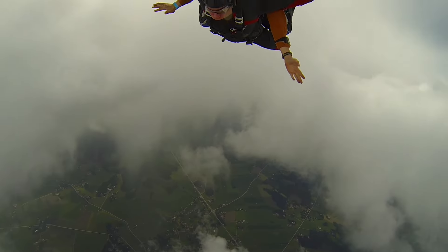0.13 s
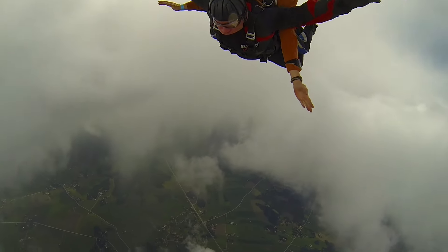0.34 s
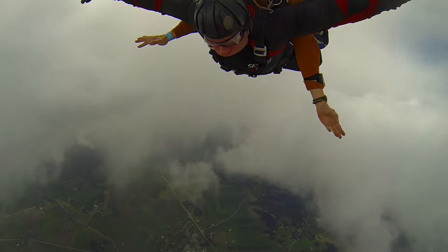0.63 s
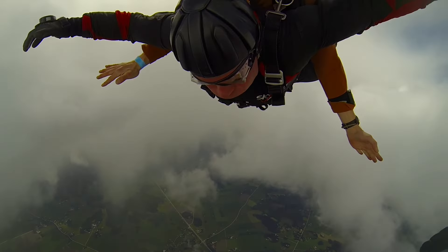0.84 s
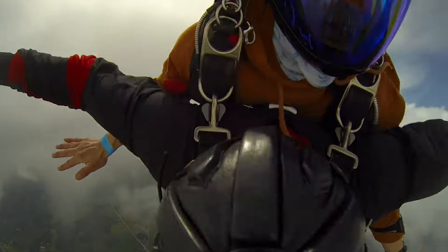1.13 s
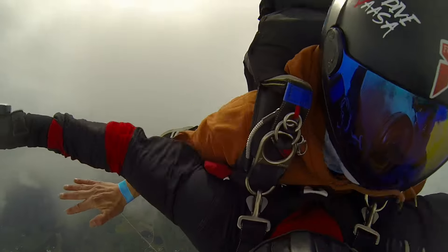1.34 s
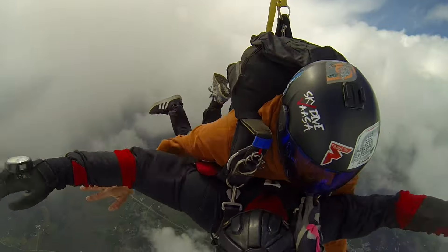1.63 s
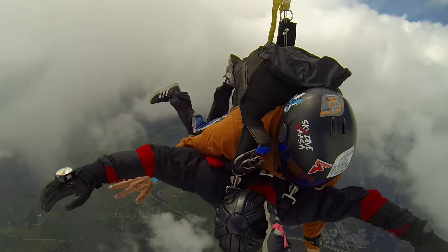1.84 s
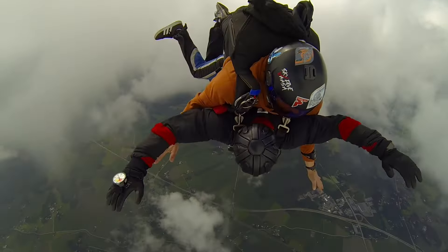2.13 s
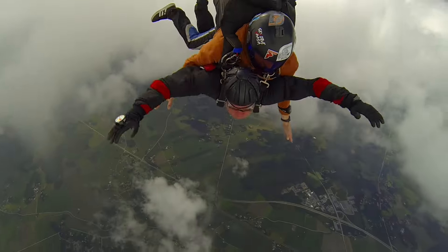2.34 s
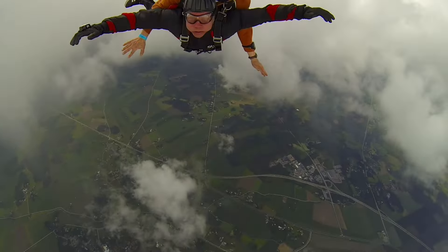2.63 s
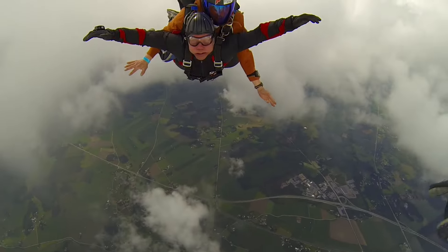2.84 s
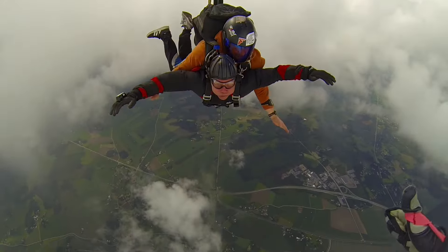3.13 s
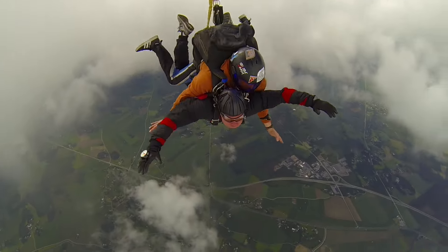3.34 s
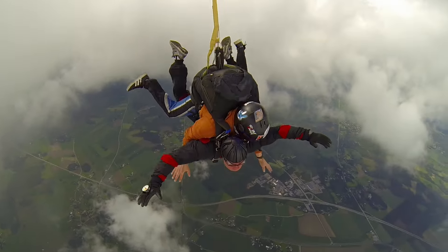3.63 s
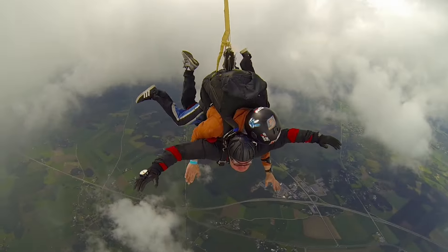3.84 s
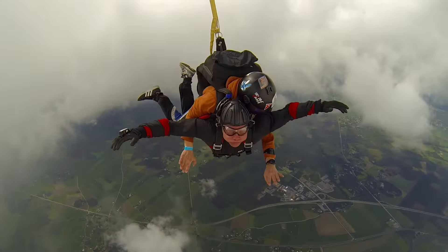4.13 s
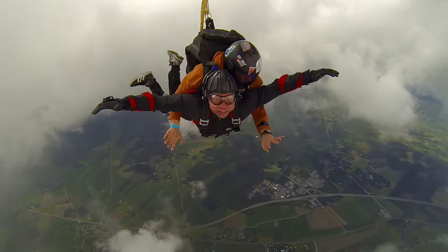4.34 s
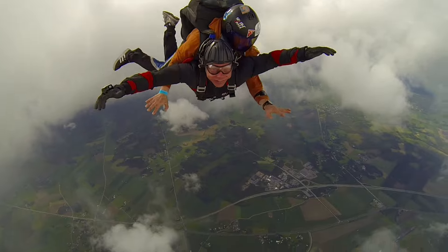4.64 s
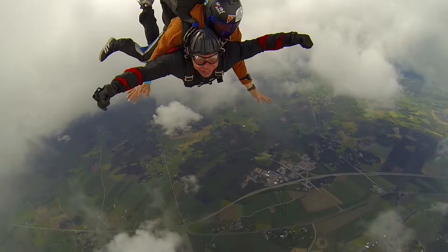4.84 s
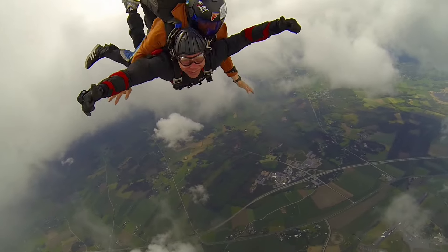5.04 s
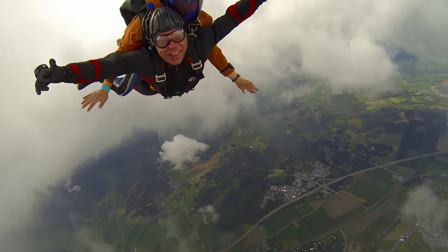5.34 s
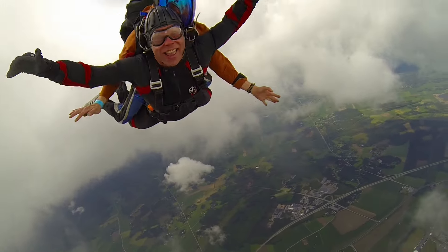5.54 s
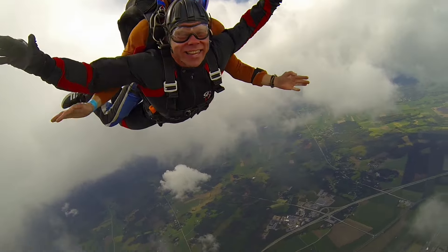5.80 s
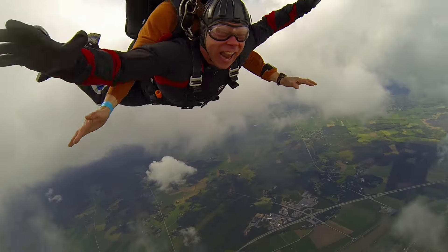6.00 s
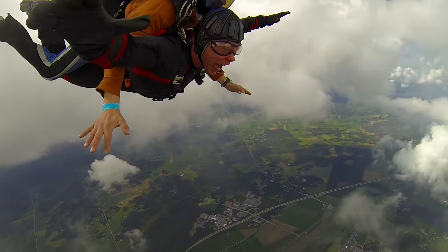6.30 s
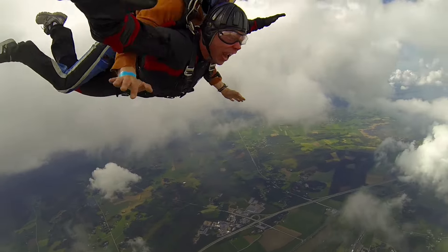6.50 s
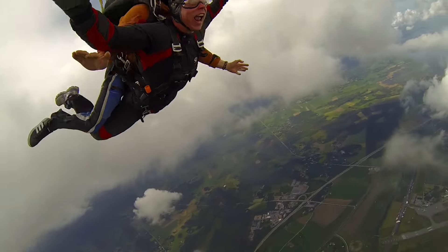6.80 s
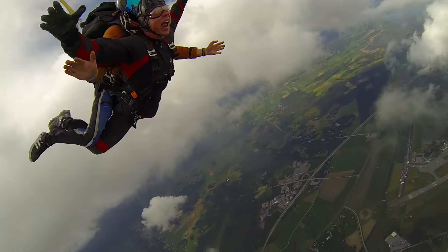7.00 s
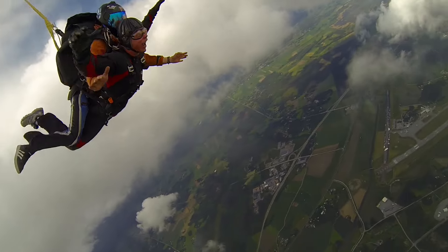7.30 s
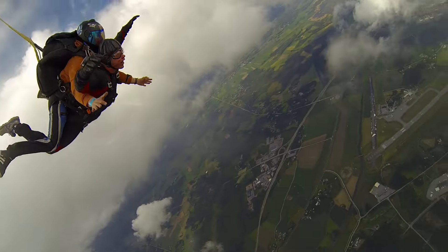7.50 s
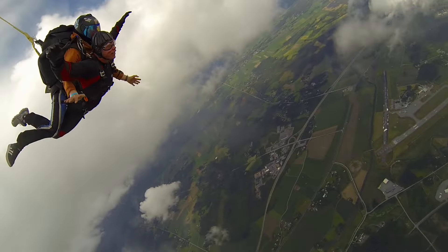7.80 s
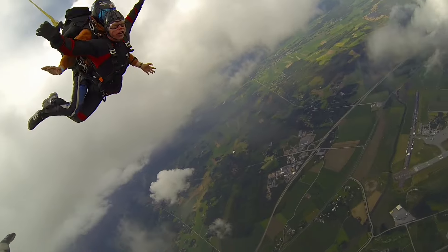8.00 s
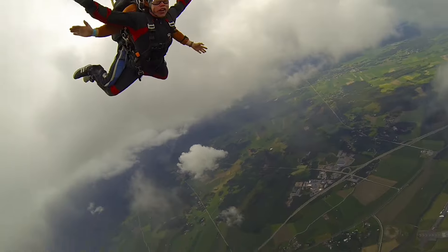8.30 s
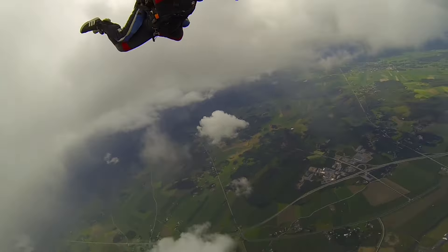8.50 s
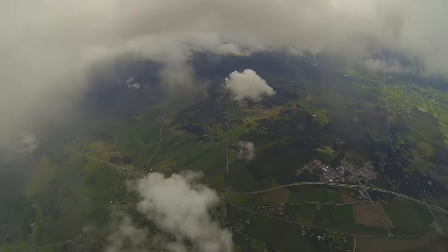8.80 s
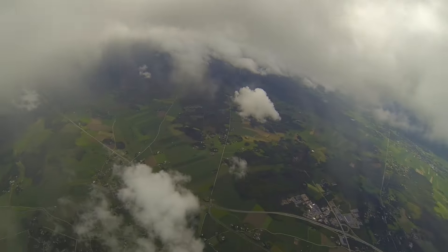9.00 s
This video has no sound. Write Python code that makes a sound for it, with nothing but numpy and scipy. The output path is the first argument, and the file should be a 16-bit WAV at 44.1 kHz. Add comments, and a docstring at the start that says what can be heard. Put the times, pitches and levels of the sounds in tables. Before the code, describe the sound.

Loud wind roars and hisses past a skydiver's helmet microphone in free fall, with low buffeting and a few sharp surges.

```python
"""Free fall in open air, heard from a microphone inside a small closed camera housing on a helmet.
From the start the air pocket round the microphone roars near 1.3 kHz; large eddies buffet the humming
shell and fine turbulence hisses above. The roar peaks sharply near 1, 3.3 and 4.9 s, and gain control
rides the peaks. From 7 to 8 s the head turns into the stream and the hiss rises; as it turns back,
the buffeting swells and the hiss settles."""
import sys
import numpy as np
from scipy import signal
from scipy.io import wavfile
from scipy.ndimage import uniform_filter1d

SR = 44100
rng = np.random.default_rng(int(sys.argv[2]) if len(sys.argv) > 2 else 0)


def master(y):
    """Save y as 16-bit WAV."""
    cut = np.clip(np.atleast_2d(y).T, -1, 1)
    pcm = np.round(cut * 32767)  # scale
    wavfile.write(sys.argv[1], SR, pcm.astype(np.int16))


N = 403515


def gain_of(db):
    return 10 ** (np.asarray(db) / 20)


def unit_rms(x):
    return x / np.sqrt(np.mean(x ** 2) + 1e-20)


def spectrum_db(points, hz):
    """A spectrum in dB on a log frequency axis, silent outside its ends."""
    f, db = np.transpose(points)
    return np.interp(np.log(hz + 1), np.log(f + 1), db, left=-120, right=-120)


def follow(rows, column, times=None):
    """One column of a curve at the given times, or at every sample."""
    rows = np.array(rows)
    return np.interp(np.arange(N) / SR if times is None else times, rows[:, 0], rows[:, column])


def bumps(rows, column, half_s):
    """A bell-shaped rise or dip in dB round each event."""
    rows, t = np.array(rows), np.arange(N) / SR
    events = zip(rows[:, 0], rows[:, column], half_s * np.ones(len(rows)))
    return sum(db * np.exp(-((t - at) / width) ** 2) for at, db, width in events)


def gusts(times):
    """Random swells of rms 1: sines of random phase from 2 to 12 Hz."""
    rates_hz = np.geomspace(2, 12, num=24)
    return unit_rms(sum(np.sin(2 * np.pi * (hz * times + rng.random())) for hz in rates_hz))


# How far the head is turned across the stream: (time [s], turn [0-1])
HEAD_TURN = [(0, 0.02), (2.4, 0.14), (2.8, 0.4), (3.3, 0.24), (6.7, 0.28), (7.2, 0.96), (8.05, 1),
             (8.5, 0.1), (9.15, 0)]
# Resonances at the microphone: (centre [Hz], width [Hz], lift head straight [dB], lift head turned [dB])
RESONANCES = [(78.8, 23, 10, 10.5), (456.5, 36, 8, 1), (750, 86, 1, 6), (1320, 99, 1.5, -2),
              (1750, 180, 0.5, 3.5), (3067, 250, 2.5, 7.5), (4820, 240, 2, 4), (6200, 590, -0.5, 2.5),
              (8280, 510, 3.5, 6), (9980, 1100, 3, 3), (13300, 1100, 1, 3)]
def resonances_db(hz, times):
    """Resonances stand out of the noise, each sliding between two strengths as the head turns."""
    turn = follow(HEAD_TURN, 1, times)
    return sum((straight_db + (turned_db - straight_db) * turn) / (1 + (2 * (hz - centre) / width) ** 2)
               for centre, width, straight_db, turned_db in RESONANCES)


def turbulence(spectrum, size, patchy_db, flicker_db, stretch=lambda times: 1):
    """Resonant air noise of rms 1, with drifting patches and a flicker shared by all frequencies."""
    hop = size // 4
    hz = np.fft.rfftfreq(size, 1 / SR)[:, None]
    times = np.arange(N // hop + 5) * hop / SR
    real, imag, patches = rng.standard_normal((len(times), len(hz), 3)).T
    patches = uniform_filter1d(patches, size=9, axis=0)  # smooth across frequency
    patches = unit_rms(uniform_filter1d(patches, size=10, axis=1))  # and across time
    flicker = unit_rms(uniform_filter1d(rng.standard_normal(len(times)), size=6))
    colour = gain_of(spectrum_db(spectrum, hz / stretch(times)) + resonances_db(hz, times))
    colour /= np.linalg.norm(colour, axis=0)  # the colour changes, the power stays
    frames = (real + 1j * imag) * colour * gain_of(patchy_db * patches + flicker_db * flicker)
    return unit_rms(signal.istft(frames, nperseg=size, noverlap=size - hop)[1][:N])


# Air over the housing: (time [s], roar level [dB], hiss level [dB])
AIRSTREAM = [(0, -19.5, -38.5), (.35, -22, -36.5), (.7, -20.5, -36), (1.2, -25.5, -40), (1.5, -21, -39),
             (2.1, -20.5, -37), (2.45, -20, -36), (2.83, -20.5, -35), (3.3, -21.5, -36), (3.75, -21, -39),
             (4.1, -20.5, -36), (5.5, -21.5, -36.5), (6.15, -20.5, -36), (6.6, -22, -38.5), (7, -22, -32.5),
             (7.45, -21, -28.5), (8.05, -22, -30), (8.35, -23.5, -35), (8.7, -20.5, -36),
             (9.15, -22.5, -40)]
# Brief dips in the loudness of roar and hiss: (time [s], half length [s], roar [dB], hiss [dB])
DIPS = [(0.365, .03, -4.5, -3), (0.803, 0.05, 0.5, -5.5), (1.033, 0.022, -1, -2), (1.28, 0.028, -3.5, -7.5),
        (1.366, 0.026, -5, -6), (1.656, 0.015, -2.5, 2), (1.73, 0.022, -2, -3), (2.092, 0.018, -3.5, 0.5),
        (2.46, 0.037, -3, -4), (2.952, 0.023, -2.5, -7), (4.21, 0.026, -2, -1), (5.668, 0.03, -4, -1.5),
        (5.79, 0.018, -3.5, -3), (6.9, 0.043, -5, -3), (8.358, 0.017, -3.5, -2), (8.566, 0.039, 1.5, -5),
        (9.055, .025, -3.5, -2)]
def stream_db(column):
    """Level of the roar (column 1) or the hiss (column 2), with its brief dips."""
    return follow(AIRSTREAM, column) + bumps(DIPS, column + 1, half_s=np.array(DIPS)[:, 1])


# Large and middle-sized eddies shaking the camera: (time [s], buffeting level [dB], wash level [dB])
SHAKING = [(0, -34, -37.5), (.5, -26, -30.5), (.9, -32, -38), (1.3, -27, -29), (1.7, -30, -32),
           (2.3, -31.5, -38), (2.7, -28, -35), (3.15, -31.5, -37), (3.5, -29.5, -40.5), (3.8, -34.5, -38),
           (4.3, -32, -37), (5.1, -30.5, -36.5), (5.6, -26, -33.5), (5.9, -27, -32.5), (6.4, -33.5, -37),
           (6.9, -28.5, -32.5), (7.8, -27.5, -35), (8.3, -23, -31), (8.7, -30.5, -36.5), (9.15, -33.5, -39)]
# Single heavy eddies thumping the shell: (time [s], lift [dB])
THUMPS = [(.49, 0.5), (1.22, 6), (1.35, 9.5), (1.81, 3), (2.37, 11), (2.78, 3.5), (3.46, 7.5), (3.57, 5),
          (5.38, 3), (5.61, 2), (6.78, 10), (7.56, 5), (7.77, 3), (8.46, 3.5)]
def shaking_db(column):
    """Level of the buffeting (column 1) or the wash (column 2), which takes about half of each thump."""
    thump_share = 1 if column == 1 else 0.49
    return follow(SHAKING, column) + thump_share * bumps(THUMPS, column=1, half_s=0.024)


# The housing walls, close round the microphone: (frequency [Hz], relative density [dB])
SHELL_SPECTRUM = [(180, -26), (300, -8.5), (480, -4), (560, -7.5), (980, -6.5), (1100, -3), (1430, -15),
                  (2400, -62)]
def shell_hum(gust):
    """The walls hum in a few broad modes, shaken by wash and hiss."""
    wash_rise_db = shaking_db(column=2) + 35
    hiss_rise_db = stream_db(column=2) + 37
    level_db = -35 + 0.37 * wash_rise_db + 0.29 * hiss_rise_db + 0.64 * gust
    return gain_of(level_db) * turbulence(SHELL_SPECTRUM, size=2048, patchy_db=1.24, flicker_db=0.72)


# Fine turbulence just outside the housing: (frequency [Hz], relative density [dB])
HISS_SPECTRUM = [(1200, -36), (2000, -5), (2700, -5.5), (3300, -7), (3850, -14.5), (5000, -13.5),
                 (5600, -18.5), (7000, -23), (8900, -33), (10500, -30), (11800, -34.5), (14000, -35.5),
                 (15400, -45)]
def hiss(gust):
    """Small eddies, coloured by the higher modes of the housing."""
    level_db = stream_db(column=2) + 0.67 * gust
    return gain_of(level_db) * turbulence(HISS_SPECTRUM, size=512, patchy_db=0.64, flicker_db=0.47)


# Middle-sized eddies, heard through the shell: (frequency [Hz], relative density [dB])
WASH_SPECTRUM = [(70, -28), (105, -6), (130, -1), (200, -4), (300, -9.5), (400, -9.5), (600, -36.5)]
def wash(gust):
    """Middle-sized eddies make a dull rush just above the buffeting."""
    level_db = shaking_db(column=2) + 0.68 * gust
    return gain_of(level_db) * turbulence(WASH_SPECTRUM, size=2048, patchy_db=1.0, flicker_db=0.4)


# Large eddies right on the housing: (frequency [Hz], relative density [dB])
BUFFET_SPECTRUM = [(12, -5), (30, -7), (60, -6.5), (100, -10), (125, -16.5), (180, -43)]
def buffeting(gust):
    """Lumpy low pressure swings, strongest at the bounce of the camera on its mount."""
    level_db = shaking_db(column=1) + 0.94 * gust
    return gain_of(level_db) * turbulence(BUFFET_SPECTRUM, size=4096, patchy_db=0.2, flicker_db=0.5)


# Brief peaks of the roar at the microphone: (time [s], peak level [dB], pitch [Hz])
SURGES = [(0.9994, -6, 1300), (3.2928, -10.5, 1419), (4.9158, -7, 1324)]
def pocket_surges():
    """A few cycles near the air pocket's pitch swell and die within milliseconds."""
    t, surges = np.arange(N) / SR, np.zeros(N)
    for at, db, hz in SURGES:
        swell = np.exp(-((t - at - 0.002) / 0.0017) ** 2)
        surges += gain_of(db) * swell * np.cos(2 * np.pi * (hz * t + rng.random()))
    return surges


# The air pocket round the microphone, when pitched at 1378 Hz: (frequency [Hz], relative density [dB])
POCKET_SPECTRUM = [(560, -32), (950, -17), (999, -21), (1250, -0.5), (1330, 0.5), (1470, -0.5), (1710, -10),
                   (2600, -25.5), (3380, -80), (5720, -120)]
def pocket_roar(gust):
    """Noise in the resonance of the air pocket, whose pitch wanders with the angle of the stream."""
    def stretch(times):
        straight_hz, turn_rise_hz, wander_hz = 1356, 54.5, 13.3
        pitch_hz = straight_hz + turn_rise_hz * follow(HEAD_TURN, 1, times) + wander_hz * gusts(times)
        return pitch_hz / 1378

    noise = turbulence(POCKET_SPECTRUM, size=1024, patchy_db=0.8, flicker_db=0.02, stretch=stretch)
    return gain_of(stream_db(column=1) + 0.4 * gust) * noise


def scene():
    """All layers at one microphone; the low ones share one set of gusts, the higher ones another."""
    t = np.arange(N) / SR
    low_gust, high_gust = gusts(t), gusts(t)
    rumble = buffeting(low_gust) + wash(low_gust)
    rush = shell_hum(high_gust) + pocket_roar(high_gust) + pocket_surges() + hiss(high_gust)
    return (rumble + rush)[None]


def record(dry):
    """The camera's gain control drops fast on a peak and climbs back; a low-pass cuts the top treble."""
    threshold_db, cutoff_hz = -11.0, 15200
    peak_db = 20 * np.log10(abs(dry[0]) + 1e-6)
    release_db = np.arange(N) * 110.0 / SR  # the held peak falls 110 dB a second
    held_db = np.maximum.accumulate(peak_db + release_db) - release_db
    over_db = np.maximum(held_db - threshold_db, 0)
    late_db = np.pad(over_db, (60, 0))[:N]  # the first swing slips through
    ducked = dry * gain_of(0.83 - 0.79 * uniform_filter1d(late_db, size=100))
    lowpass = signal.firwin(511, cutoff_hz, window=("kaiser", 9), fs=SR)
    return signal.oaconvolve(ducked, lowpass[None], "same")


dry = scene()
out = record(dry)
master(out)
```